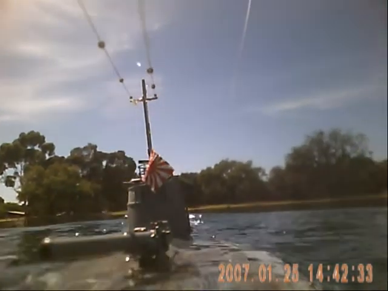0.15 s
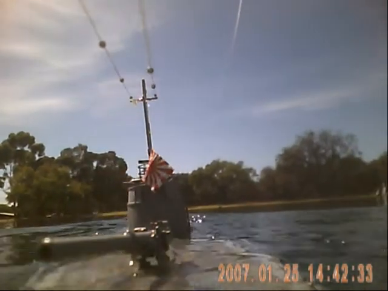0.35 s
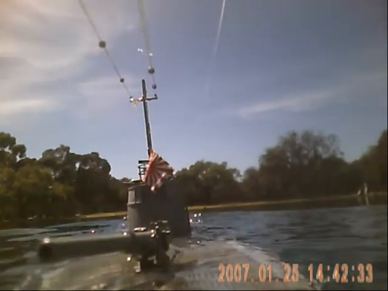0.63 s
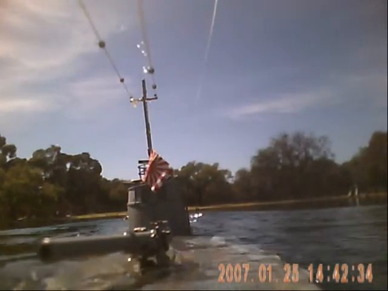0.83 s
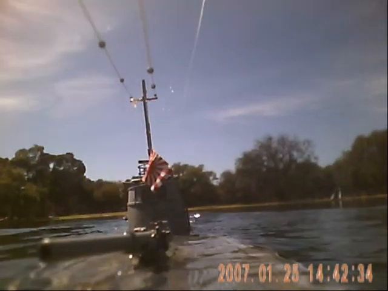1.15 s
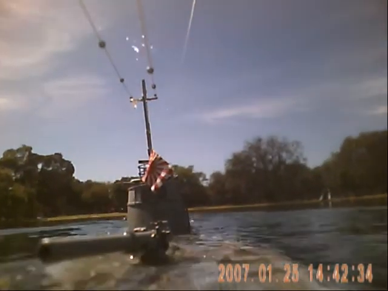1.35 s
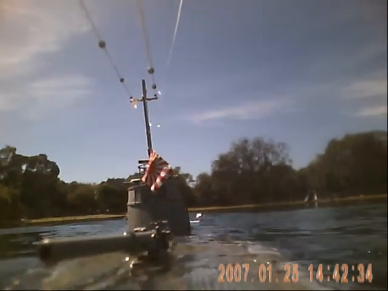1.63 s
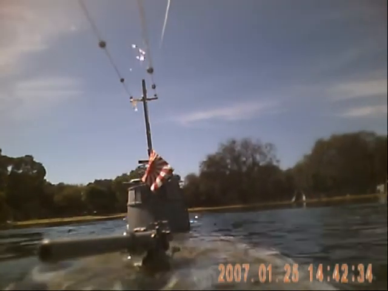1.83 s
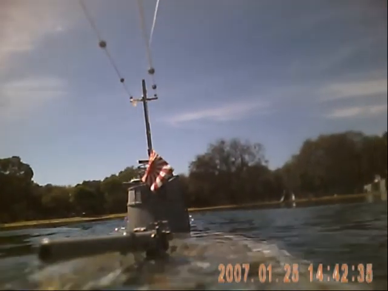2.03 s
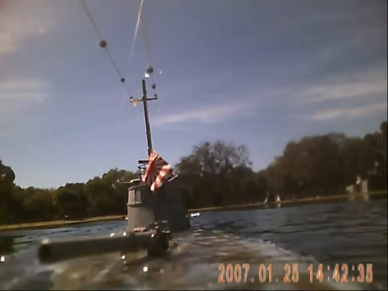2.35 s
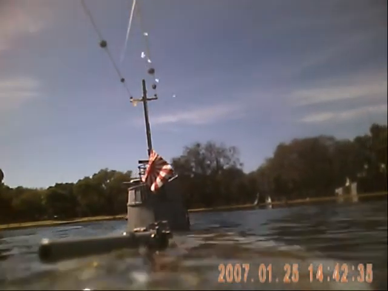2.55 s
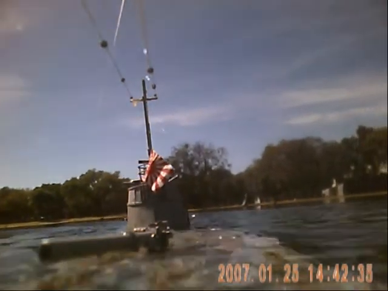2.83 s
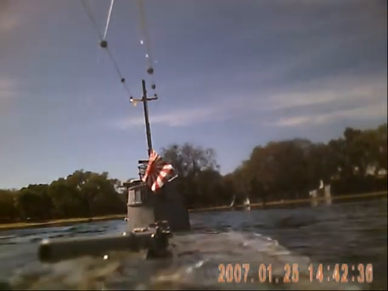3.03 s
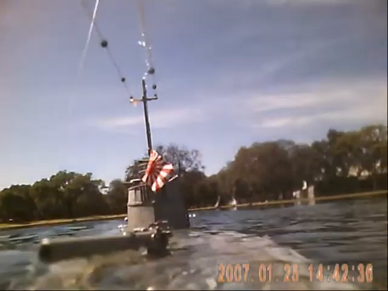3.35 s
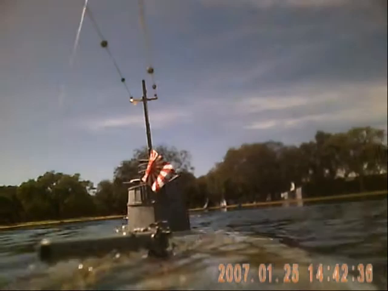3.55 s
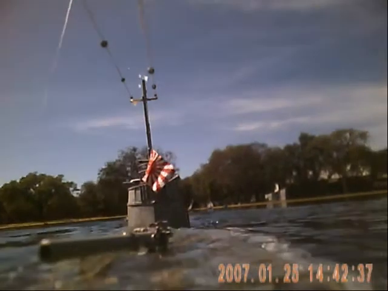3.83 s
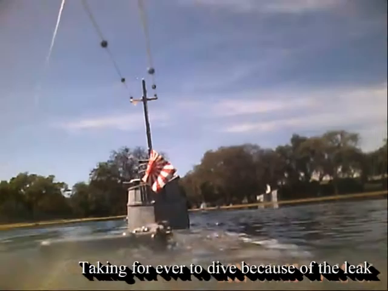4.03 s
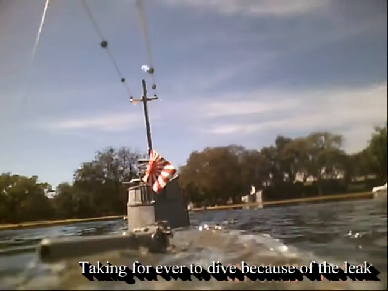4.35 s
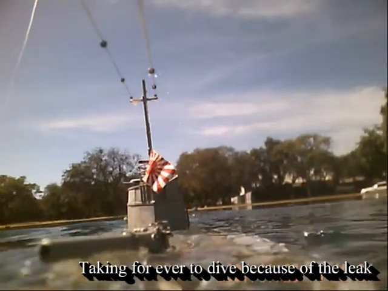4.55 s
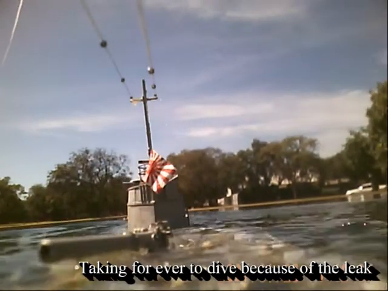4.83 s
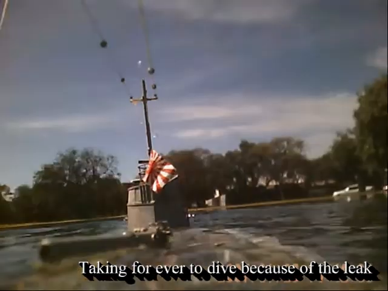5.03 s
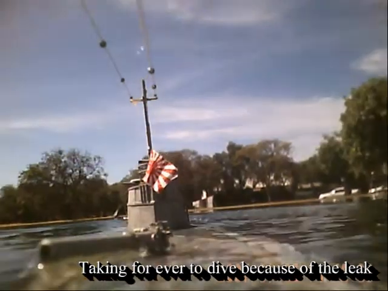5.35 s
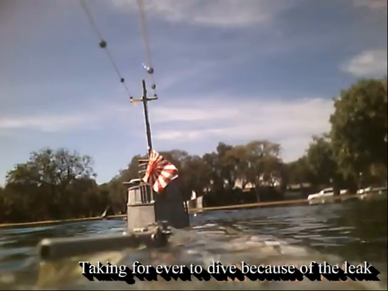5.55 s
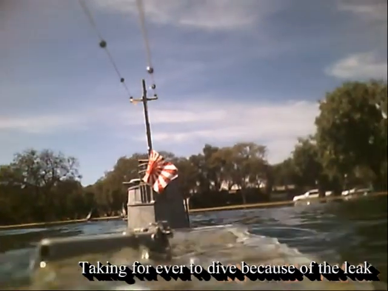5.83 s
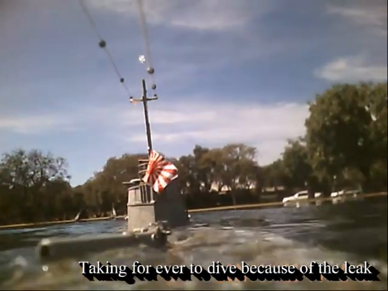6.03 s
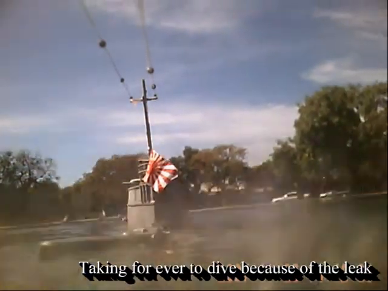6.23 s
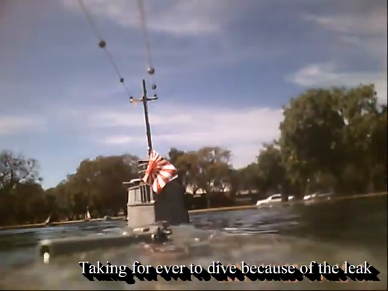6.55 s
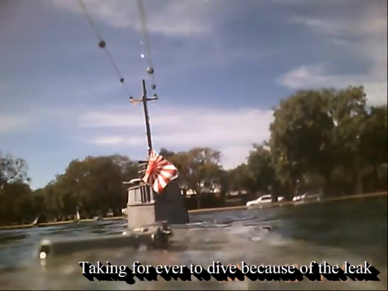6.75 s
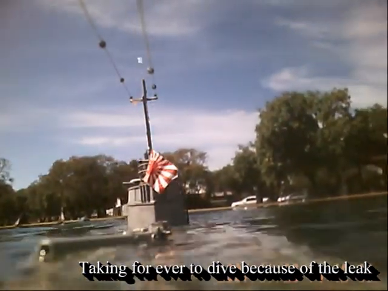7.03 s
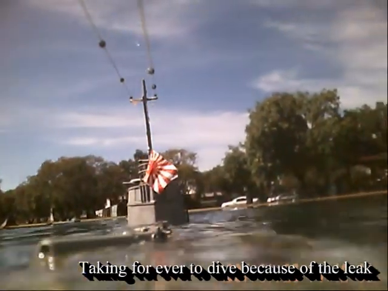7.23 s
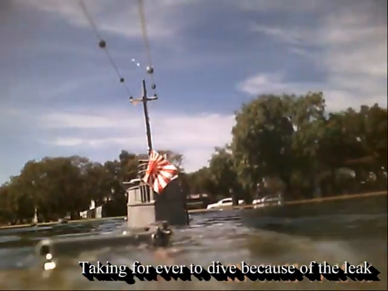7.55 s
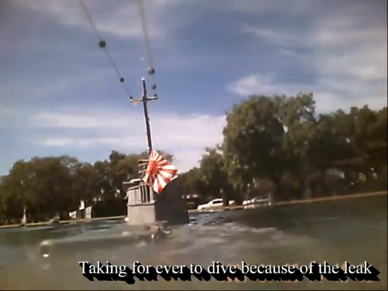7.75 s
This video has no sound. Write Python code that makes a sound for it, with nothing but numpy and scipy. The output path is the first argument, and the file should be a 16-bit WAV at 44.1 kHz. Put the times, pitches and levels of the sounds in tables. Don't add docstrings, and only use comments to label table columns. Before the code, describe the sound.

Two small electric motors drive a model boat at constant speed, heard very close through its hull. A low hum beats about twice a second under a dense, fast rattle of knocks and gearbox chatter. A nasal gear whine wavers on top, with scratchy chirps repeating so quickly they blur into a buzz. The sound is dry, mono and slightly squashed, with light hiss.

```python
import sys
import numpy as np
from scipy import signal
from scipy.fft import rfft, irfft, next_fast_len
from scipy.io import wavfile
from scipy.ndimage import map_coordinates

SR = 44100
rng = np.random.default_rng(int(sys.argv[2]) if len(sys.argv) > 2 else 0)


def materialize(psi):
    bounded = np.clip(np.atleast_2d(psi).T, -1, 1)
    quanta = np.round(bounded * 32767).astype(np.int16)
    wavfile.write(sys.argv[1], SR, quanta)


def voltage_ratio(decibels):
    exponent = np.asarray(decibels, float) / 20
    return 10 ** exponent


N = 347949

# t/s, speed/turns per s
SHAFT_SPEED = [(0.0, 41.493), (0.61, 41.448), (1.21, 41.349), (1.82, 41.333), (2.43, 41.358),
               (3.03, 41.184), (3.64, 41.287), (4.25, 41.371), (4.86, 41.566), (5.46, 41.25),
               (6.07, 41.602), (6.68, 41.277), (7.28, 41.237), (7.89, 41.566)]
START_ANGLE = (.095, .199)
# multiple of the shaft speed, level/dB
PORT_UNBALANCE = [(1, -66), (2, -32.5), (3, -42), (4, -54.5)]
STARBOARD_UNBALANCE = [(1, -50), (2, -37), (3, -44.5), (4, -53)]
# multiple of the shaft speed, level/dB
COUPLING_KNOCK = [(6, -47), (7, -52), (8, -38), (9, -38), (10, -39), (11, -36), (12, -35), (13, -34),
                  (14, -31), (15, -35), (16, -33), (17, -37), (18, -44), (19, -46), (20, -49), (21, -41),
                  (22, -47), (23, -48), (24, -44)]
# multiple of the shaft speed, level/dB
TRAIN_WHIRR = [(5, -44), (6, -44), (7, -51), (8, -50), (9, -39), (10, -44), (11, -43), (12, -37), (13, -39),
               (14, -43), (15, -45), (20, -45), (21, -47), (23, -44)]
# t/s, level/dB
MESH_LEVEL = [(0, -29), (1.7, -27.5), (2.1, -30.5), (3, -35), (4.2, -33), (5.05, -28.5), (5.35, -33.5),
              (5.75, -26), (6.5, -27.5), (6.95, -32), (7.22, -25), (7.5, -36.5), (7.65, -24.5),
              (7.89, -28.5)]
# t/s, level/dB
TOOTH_SKIPS = [
    (2.72, -14),
    (4.2, -6),
    (5.19, -6),
    (5.67, -31),
    (6.24, -23),
]
# t/s, f/Hz
PINION_SURGES = [
    (.48, -9),
    (2.04, 14),
    (4.09, -13.5),
    (4.35, 10),
    (5.85, 14),
    (6.33, 14),
    (6.9, -14),
    (7.25, 20),
    (7.63, 31.5),
    (7.8, 11.5),
]
# angle/turns, f/Hz, falling chirp level/dB, rising chirp level/dB
SEAL_SLIP = [
    (-.25, 3500, -50, -50),
    (-.165, 3300, -20, -50),
    (-.14, 3000, 0, -50),
    (-.11, 2700, 0, -50),
    (.04, 2450, -15, -50),
    (.17, 2600, -22, -14),
    (.3, 3000, -50, -3),
    (.5, 3450, -50, 0),
    (.64, 3900, -50, -1),
    (.75, 4100, -50, -30),
]
# t/s, level/dB as it sticks, level/dB as it lets go
SEAL_PRESSURE = [
    (0, -1.2, -3),
    (2, -0.075, -6),
    (4, 2.5, -7),
    (6, 0.8, -2),
    (7.89, -0.18, 2),
]
# f/Hz, width/Hz, level/dB
CHIRP_MODES = [(2670, 620, 13.5), (3100, 500, 5), (3450, 300, 3)]
OCTAVE_MODES = [(5180, 750, -6), (5500, 400, -7), (6070, 500, 0)]
# f/Hz, level/dB
CASE_MUTING = [(300, 0), (3750, 0), (4200, -14), (4600, -40)]
# f/Hz, level/dB per Hz
HULL_RATTLE = [(30, -40), (60, -20), (145, -17.5), (185, -13), (270, -16), (340, -3.5), (420, -5),
               (545, 0.5), (640, -6.5), (720, -7.5), (1000, -9), (1200, -30.5), (1500, -62)]
# f/Hz, level/dB per Hz
GEAR_RATTLE = [(900, -22), (1100, -3), (1240, 4.5), (1450, -6.5), (1620, -9.5), (2030, -5), (2350, -11),
               (2700, -18), (3100, -17), (3800, -21.5), (4150, -34), (4400, -68)]
# f/Hz, level/dB per Hz
CAMERA_HISS = [(300, -2.5), (4500, 2), (7000, -1), (10000, -3), (13450, -6), (13600, -14), (13750, -45)]
# t/s, level/dB
ROUGH_PATCHES = [(.02, -0.5), (.13, -1), (.3, -2), (.75, 1.5), (.9, 0.5), (1.11, 0), (1.26, -0.5),
                 (2.02, 1), (2.33, 1), (3.07, 1.5), (3.23, 0), (3.46, 2.5), (3.55, -2), (4.55, 1),
                 (4.64, 1.5), (4.86, -1), (5.0, 0), (5.36, 1), (6.9, 0.5), (7.4, 1)]
# t/s, share 0-1
SETTLING = [
    (0, 0),
    (3.2, 0),
    (4.2, 0.13),
    (6, 0.74),
    (7.89, 0.8),
]

PORT_SLOWER, HUNT_TURNS = .95492, .008
TEETH = 30
WHISTLE_HZ, CAMERA_HZ = 1478, 8443
WHISTLE_DB, WHISTLE_FLICKER_DB = -46.5, 4.5
PORT_WHINE_DB, PORT_FLICKER_DB, STARBOARD_FLICKER_DB = -36.5, 2.2, 1.4
SKIP_S, SURGE_S, BACKLASH_HZ = .025, .0442, 8
CHIRP_DB, LOWER_OCTAVE_DB, UPPER_OCTAVE_DB, RISING_DB = -37, -54, -55.5, -47.5
HULL_DB, GEARS_DB, KNOCK_DB = -26.5, -28.56, .39
ROUGH_S, SHAKE_DB = .04, .5
DIVE_HUM_DB, DIVE_KNOCK_DB, DIVE_HULL_DB, DIVE_WHISTLE_DB = -3.5, -1.3, 1.5, 7
DIVE_LOWER_OCTAVE_DB, DIVE_UPPER_OCTAVE_DB, DIVE_MESH_HZ = -5.5, -.5, 3
AMPLIFIER_OFFSET = -.6375


def unit(x):
    return x / np.sqrt(np.mean(x ** 2) + 1e-20)


def curves(rows):
    s, *columns = np.transpose(rows)
    return [np.interp(np.arange(N) / SR, s, column) for column in columns]


def bumps(rows, width_s):
    t = np.arange(0, N / SR, .002)
    swings = sum(size * np.exp(-((t - s) / width_s) ** 2) for s, size in rows)
    return np.interp(np.arange(N) / SR, t, swings)


def wobble(rate):
    coarse = np.arange(0, N + 16, 16)
    knots = rng.standard_normal(int(N * rate / SR) + 4)
    return np.interp(np.arange(N), coarse, map_coordinates(knots, [coarse * rate / SR]))


def filtered(x, response):
    m = next_fast_len(N + 8192)
    return irfft(rfft(x, m) * response(np.fft.rfftfreq(m, 1 / SR)), m)[:N]


def coloured(x, points):
    f, db = np.transpose(points)
    return unit(filtered(x, lambda hz: voltage_ratio(np.interp(np.log(hz + 1), np.log(f), db))))


def ringing(x, modes):
    def resonance(f, centre, width):
        return 1j * f * width / (centre * centre - f * f + 1j * f * width)

    return unit(filtered(x, lambda f: sum(voltage_ratio(db) * resonance(f, c, w) ** 2 for c, w, db in modes)))


def orders(turn, table, phase, unsteady_db=0, rate=9):
    knots, at = np.arange(99), np.arange(N) * rate / SR

    def size(db):
        drift_db = unsteady_db * rng.standard_normal(len(knots))
        return np.interp(at, knots, np.sqrt(2) * voltage_ratio(db + drift_db))

    return sum(size(db) * np.cos(2 * np.pi * round(k) * turn + phase(k)) for k, db in table)


def burst(turn, rise, fall):
    u = turn % 1
    return (1 - np.exp(-(u / rise) ** 2)) * np.exp(-u / fall)


def electronics(dive):
    t = np.arange(N) / SR
    whistle_db = WHISTLE_DB + DIVE_WHISTLE_DB * dive + WHISTLE_FLICKER_DB * wobble(8)
    whistle = voltage_ratio(whistle_db) * np.sin(2 * np.pi * WHISTLE_HZ * t)
    camera_tone = voltage_ratio(-77) * np.sin(2 * np.pi * CAMERA_HZ * t)
    hiss = voltage_ratio(-50.5) * coloured(rng.standard_normal(N), CAMERA_HISS)
    return whistle + camera_tone + hiss


def rattle(port, hull_db):
    stirred = 1 + .5 * burst(port + .06, rise=.17, fall=.046)
    hull = coloured(rng.standard_normal(N) * stirred * voltage_ratio(.59 * wobble(40)), HULL_RATTLE)
    gears = coloured(rng.standard_normal(N) * voltage_ratio(1.84 * wobble(300) + .11 * wobble(30)), GEAR_RATTLE)
    return voltage_ratio(hull_db) * hull + voltage_ratio(GEARS_DB + .47 * wobble(2.5)) * gears


def seal_chirp(starboard, dive):
    stick_db, release_db = curves(SEAL_PRESSURE)
    turn = (starboard + .255 + .008 * wobble(35)) % 1 - .25
    angle, *columns = np.transpose(SEAL_SLIP)
    slip_hz, fall_db, rise_db = (np.interp(turn, angle, column) for column in columns)
    phase = 2 * np.pi * np.cumsum(slip_hz * (1 + .015 * wobble(45) + .035 * wobble(900))) / SR

    def grit(share):
        return share * rng.standard_normal(N)

    falling = voltage_ratio(fall_db + .6 * wobble(35) + 1.2 * wobble(500)) * (np.sin(phase) + grit(.7))
    falling = voltage_ratio(CHIRP_DB + stick_db) * coloured(ringing(falling, CHIRP_MODES), CASE_MUTING)

    early_db = np.interp(turn + .025, angle, columns[1])
    octave = voltage_ratio(early_db + 1.2 * wobble(35) + 1.7 * wobble(500)) * (np.sin(2 * phase) + grit(1.2))
    lower = voltage_ratio(LOWER_OCTAVE_DB + DIVE_LOWER_OCTAVE_DB * dive) * ringing(octave, OCTAVE_MODES[:2])
    upper = voltage_ratio(UPPER_OCTAVE_DB + DIVE_UPPER_OCTAVE_DB * dive) * ringing(octave, OCTAVE_MODES[2:])

    rising = voltage_ratio(rise_db + 1.5 * wobble(35) + 1.6 * wobble(600)) * np.sin(phase)
    rising = voltage_ratio(RISING_DB + release_db) * coloured(rising, CASE_MUTING)
    return falling + lower + upper + rising


def whirr(starboard):
    shaft = starboard + .0023 * wobble(15)
    return orders(shaft, TRAIN_WHIRR, lambda k: rng.uniform(0, 2 * np.pi), unsteady_db=3, rate=12)


def whine(port, starboard, dive):
    def mesh_tone(cycles):
        return unit(np.cos(2 * np.pi * cycles + .5 * wobble(25)) * voltage_ratio(1.1 * wobble(28)))

    port_db = PORT_WHINE_DB + PORT_FLICKER_DB * wobble(11)
    starboard_db = curves(MESH_LEVEL)[0] + bumps(TOOTH_SKIPS, SKIP_S) + STARBOARD_FLICKER_DB * wobble(11)
    port_ahead_hz = BACKLASH_HZ / 2 * wobble(14)
    starboard_ahead_hz = BACKLASH_HZ * wobble(18) + bumps(PINION_SURGES, SURGE_S) + DIVE_MESH_HZ * dive
    port_tone = mesh_tone(TEETH * port + np.cumsum(port_ahead_hz) / SR)
    starboard_tone = mesh_tone(TEETH * starboard + np.cumsum(starboard_ahead_hz) / SR)
    return voltage_ratio(port_db) * port_tone + voltage_ratio(starboard_db) * starboard_tone


def hum(port, starboard, load_db):
    def lag(k):
        return .8 * (k - 1)

    both = orders(port, PORT_UNBALANCE, lag) + orders(starboard, STARBOARD_UNBALANCE, lag)
    return voltage_ratio(load_db + .91 * wobble(5.12)) * both


def knock(port, load_db):
    def lag(k):
        return -1.9 + 1.1 * max(k - 15.5, 0)

    slack = .005 * wobble(25)
    thumps = orders(port + slack, COUPLING_KNOCK, lag, unsteady_db=2.5, rate=12)
    return voltage_ratio(load_db + .46 * wobble(30)) * thumps


def scene():
    turns = np.cumsum(curves(SHAFT_SPEED)[0]) / SR
    hunt = HUNT_TURNS * wobble(5)
    port = PORT_SLOWER * turns + START_ANGLE[0] + hunt
    starboard = turns + START_ANGLE[1] + hunt
    dive, = curves(SETTLING)
    shake_db = bumps(ROUGH_PATCHES, ROUGH_S) + SHAKE_DB * wobble(6)

    mix = electronics(dive)
    mix = mix + rattle(port, HULL_DB + DIVE_HULL_DB * dive + shake_db)
    mix = mix + seal_chirp(starboard, dive)
    mix = mix + whirr(starboard)
    mix = mix + whine(port, starboard, dive)
    mix = mix + hum(port, starboard, DIVE_HUM_DB * dive)
    mix = mix + knock(port, KNOCK_DB + DIVE_KNOCK_DB * dive + shake_db)
    return mix[None]


def low_pass(x):
    return signal.sosfilt(signal.butter(12, 13700, fs=SR, output="sos"), x)


def record(dry):
    x = dry[0] + AMPLIFIER_OFFSET
    squeezed = x / (1 + np.abs(x / .985) ** 16) ** (1 / 16) - x
    rounded = filtered(squeezed, lambda hz: np.exp(-(hz / 3000) ** 6))
    return low_pass((x + rounded)[None])


dry = scene()
out = record(dry)
materialize(out)
```